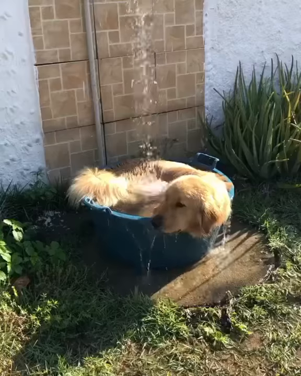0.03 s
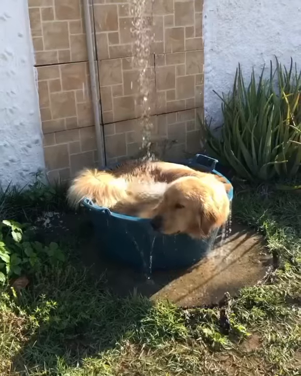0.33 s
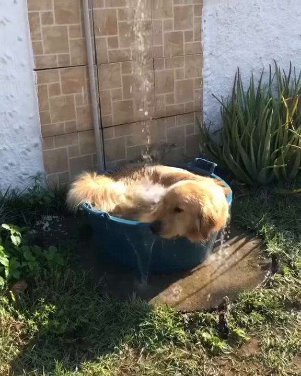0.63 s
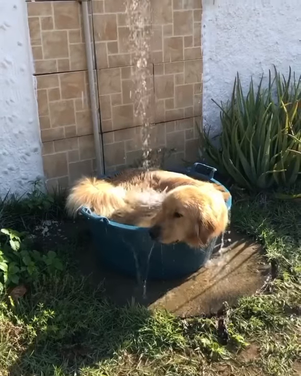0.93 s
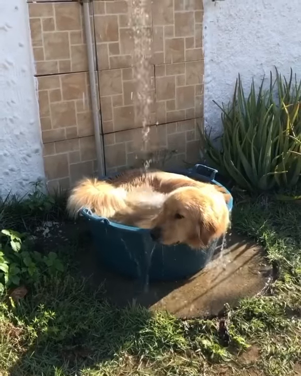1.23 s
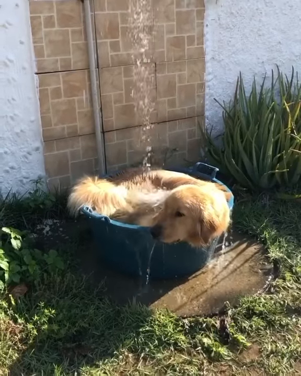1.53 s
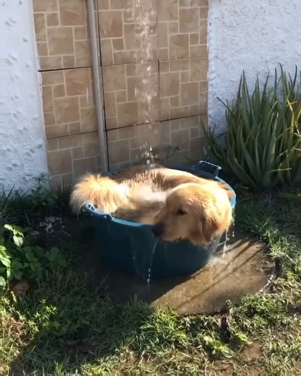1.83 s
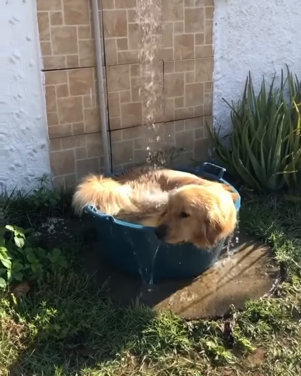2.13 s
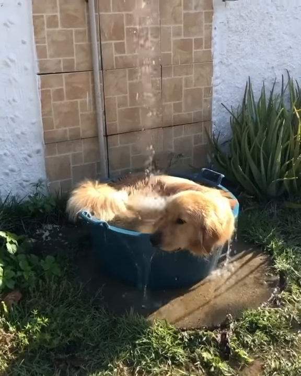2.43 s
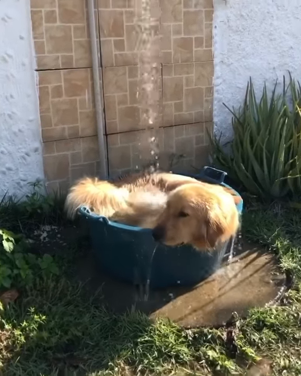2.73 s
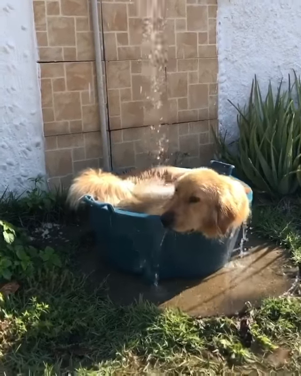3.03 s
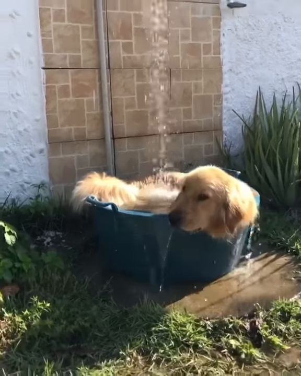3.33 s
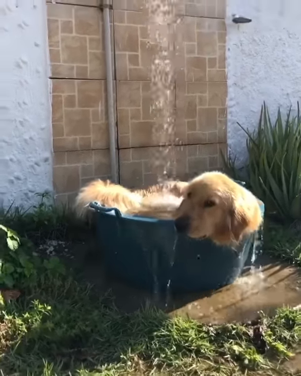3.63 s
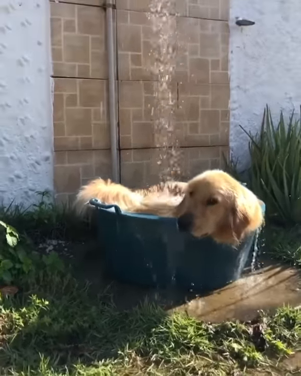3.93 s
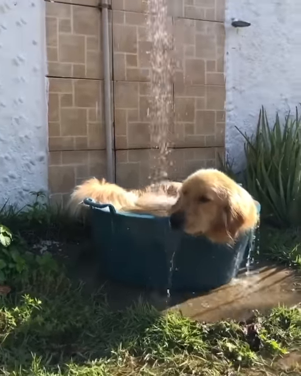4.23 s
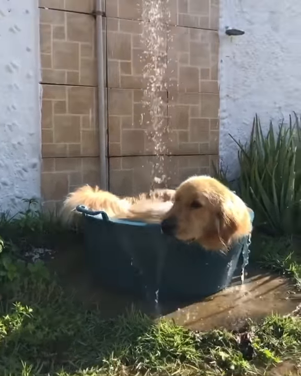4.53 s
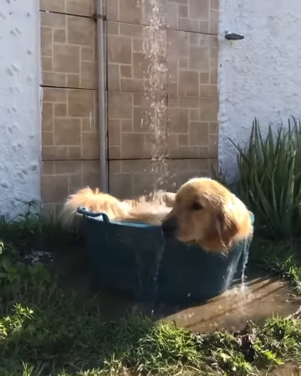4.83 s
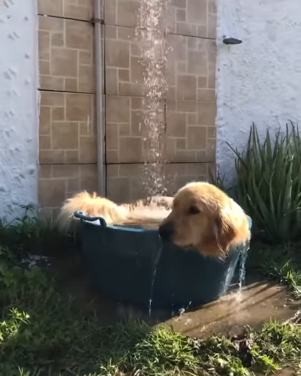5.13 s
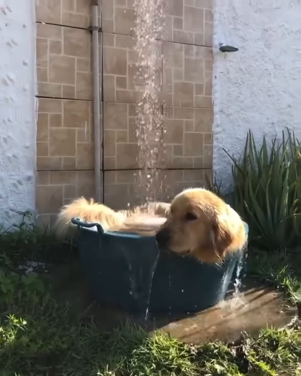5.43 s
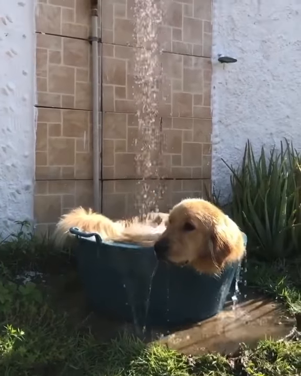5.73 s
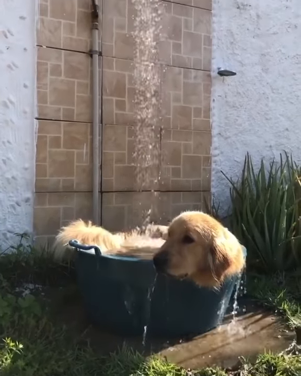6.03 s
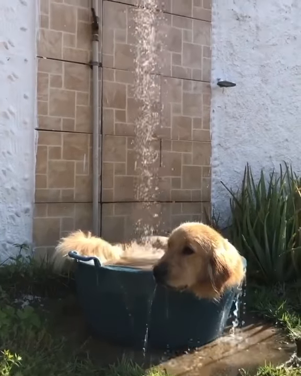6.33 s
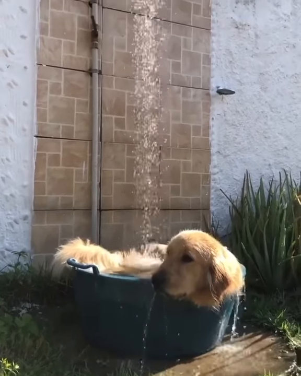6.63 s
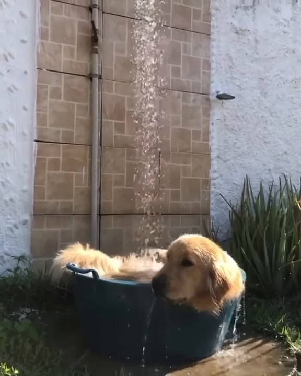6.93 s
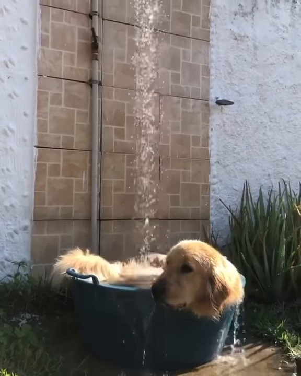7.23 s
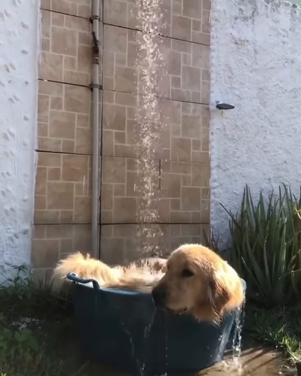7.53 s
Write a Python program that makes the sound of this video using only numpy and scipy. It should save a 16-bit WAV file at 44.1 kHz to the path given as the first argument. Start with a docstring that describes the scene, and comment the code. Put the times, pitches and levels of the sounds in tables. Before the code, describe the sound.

A broken stream of water splashes steadily into a full plastic tub outdoors, overflow pattering on concrete over a faint hum and distant traffic.

```python
"""Close, steady splashing: a broken stream falls from high up into a full plastic tub in a yard.
A dog lies in the tub, and the stream drifts between its back and open water. Each lump of water
slaps, traps air and throws spray; the overflow patters on wet concrete. The wall close behind
colours the splashing at the one microphone, and a motor hum and distant traffic lie underneath."""
import sys
import numpy as np
from scipy import signal
from scipy.fft import rfft, irfft
from scipy.io import wavfile
from scipy.ndimage import uniform_filter1d, map_coordinates

SR = 44100
rng = np.random.default_rng(int(sys.argv[2]) if len(sys.argv) > 2 else 0)


def digitize_waveform(pressure):
    """Quantize a signal to 16-bit integers and store it at the path in sys.argv[1].

    Rows of a 2-D input are taken as channels; values are limited to [-1, 1].
    """
    field = np.atleast_2d(pressure).T
    bounded = np.clip(field, -1, 1)
    quanta = np.round(bounded * 32767).astype(np.int16)
    wavfile.write(sys.argv[1], SR, quanta)


N = 338688
TOP_HZ = 14150  # upper edge of the band


def amp(db):
    """Decibels to gain."""
    return 10 ** (np.asarray(db) / 20)


def unit(x):
    """x at rms 1."""
    return x / np.sqrt(np.mean(x ** 2) + 1e-20)


def noise():
    """White noise as long as the scene."""
    return rng.standard_normal(N)


def along(points, hz):
    """(Hz, value) points interpolated at hz on a log axis."""
    f, v = np.transpose(points)
    return np.interp(np.log(hz + 1), np.log(f + 1), v)


def curves(rows):
    """One value per sample for each column after the time."""
    times, *columns = np.transpose(rows)
    return [np.interp(np.arange(N) / SR, times, column) for column in columns]


def wobble(rate):
    """A smooth random curve, rate knots a second."""
    return map_coordinates(rng.standard_normal(int(N * rate / SR) + 4), [np.arange(N) * rate / SR])


def coloured(x, spectrum, size=8192):
    """x through a causal filter with the given spectrum, at rms 1."""
    cepstrum = irfft(np.log(amp(along(spectrum, np.fft.rfftfreq(size, 1 / SR)))))
    cepstrum[1:size // 2] *= 2  # fold to minimum phase
    cepstrum[size // 2 + 1:] = 0
    impulse = irfft(np.exp(rfft(cepstrum)))
    return unit(signal.fftconvolve(x, impulse)[:N])


def steady(x):
    """x with its slow level evened out."""
    power = uniform_filter1d(uniform_filter1d(x ** 2, SR // 6), SR // 6)
    return x / np.sqrt(np.abs(power) + 1e-12)


def pings(start, gain, hz, cycles, samples, rise=0):
    """Damped sines of peak about gain that swell in a cycle or two, fade over cycles, glide by rise."""
    turns = np.minimum(hz, TOP_HZ)[:, None] * np.arange(samples) / SR
    age = turns / np.reshape(cycles, (-1, 1))
    shape = (1 - np.exp(-turns ** 2 / 2)) * np.exp(-age)
    glide = 1 + rise * np.minimum(age, 2) / 2
    wave = shape / shape.max(axis=1, keepdims=True) * np.sin(2 * np.pi * turns * glide)
    at = (np.abs(start) * SR).astype(int)[:, None] + np.arange(samples)
    return np.bincount(at.ravel(), (gain[:, None] * wave).ravel(), N)[:N]


def bursts(start, gain, life_s, swell_s):
    """The envelope of blows that each build up over swell_s and die away over life_s."""
    power = np.bincount((np.abs(start) * SR).astype(int), gain ** 2, N)[:N]
    keep = np.exp(-1 / (swell_s * SR))
    power = signal.lfilter([1 - keep], [1, -keep], power)
    return np.sqrt(signal.lfilter([1], [1, -np.exp(-2 / (life_s * SR))], power))


def scatter(spread_db, count):
    """Random times with sizes that are mostly small, now and then large."""
    when, chance = rng.random((count, 2)).T
    return when * N / SR, amp(-spread_db * np.log(.035 + .965 * chance))


def pitches(centre_hz, spread, count):
    """Pitches scattered around a centre, with spread on a natural-log scale."""
    return centre_hz * np.exp(spread * np.clip(rng.standard_normal(count), -2, 2))


# The stream at the tub, drifting between open water and the dog's back.
# Each row: time in seconds, then relative levels of plunge, spray and gurgle in dB.
STREAM_LEVELS = [(0, -46, -40.5, -51.5), (1.2, -44.5, -39, -50.5), (2.4, -42.5, -37.5, -49.5),
                 (3.48, -43.5, -37.5, -50), (3.68, -42.5, -38.5, -56), (3.87, -42, -39, -51.5),
                 (4.1, -42.5, -38.5, -55.5), (5.2, -42.5, -38, -53), (6.3, -46, -36.5, -57),
                 (6.7, -47, -37.5, -55.5), (7.68, -44, -37, -52)]
# The colours of those three, heard close up. Each row: frequency in Hz, relative level in dB.
PLUNGE_SPECTRUM = [(30, -45), (150, -15), (330, -9), (600, -17), (950, -13.5), (1200, -3), (1650, -3),
                   (2200, -9), (3200, -3.5), (7000, -50.5)]
SPRAY_SPECTRUM = [(300, -31), (1000, 0), (2000, -0.5), (2900, 1.5), (4600, 1), (6500, 1), (9000, -1),
                  (14000, -4)]
GURGLE_SPECTRUM = [(30, -53), (120, -25), (250, -6.5), (450, -9), (600, 2), (780, 4.5), (900, -0.5),
                   (1100, -34), (2000, -37)]


def stream(lumps=1000):
    """Lumps of water hit the surface: each opens a ringing cavity and throws a cloud of droplets."""
    plunge_db, spray_db, gurgle_db = curves(STREAM_LEVELS)
    start, size = scatter(spread_db=0.84, count=lumps)
    varied = lambda: size * amp(5.2 * rng.random(lumps))  # no two lumps split their energy alike
    cavities = pings(start, varied(), pitches(1414, 0.26, lumps), cycles=1.14, samples=500, rise=0.044)
    churn = bursts(start, varied(), life_s=0.006, swell_s=0.0014) * noise()
    plunge = coloured(amp(-10.5) * unit(cavities) + unit(churn) + amp(-7.5) * noise(), PLUNGE_SPECTRUM)
    # air dragged deeper rings lower, over a steady wash
    pockets = pings(start, varied(), pitches(606, 0.41, lumps), cycles=0.81, samples=900, rise=0.075)
    gurgle = coloured(amp(-11.5) * unit(pockets) + noise(), GURGLE_SPECTRUM)
    # droplets land loudest just after each lump; the same cloud hisses as a mist
    landing, weight = scatter(spread_db=3.5, count=13000)
    cloud = bursts(start, varied(), life_s=0.019, swell_s=0.0011)
    droplet_hz = rng.uniform(1200, TOP_HZ, len(landing))
    droplet_gain = weight * cloud[(landing * SR).astype(int)] * droplet_hz
    droplets = pings(landing, droplet_gain, droplet_hz, cycles=0.81, samples=90)
    mist = unit(cloud * noise())
    spray = coloured(unit(droplets) + amp(-2.5) * mist + amp(0.5) * noise(), SPRAY_SPECTRUM)
    body = amp(gurgle_db - 6.5) * steady(gurgle) + amp(plunge_db - 7.0) * steady(plunge)
    return body, amp(spray_db - 4.5) * steady(spray)


# The colour of a wet slap at the tub. Each row: frequency in Hz, relative level in dB.
SPLAT_SPECTRUM = [(300, -21), (700, -5), (1100, -3.5), (1700, 6), (2200, 1), (3300, 0), (5000, 4),
                  (7500, -7.5), (14000, -4)]


def splats():
    """Middling drops break away from the stream and land one by one, each with a short wet tick."""
    spray_db = curves(STREAM_LEVELS)[1]
    start, size = scatter(spread_db=2.5, count=480)
    ticks = bursts(start, size, life_s=0.0028, swell_s=0.00035) * noise()
    return amp(spray_db - 10.5) * coloured(ticks, SPLAT_SPECTRUM)


def overflow(drops=1100, bubbles=1000):
    """Water off the rim patters on the concrete, and tiny bubbles fizz in the puddle."""
    spray_db = curves(STREAM_LEVELS)[1]
    start, size = scatter(spread_db=5.0, count=drops)
    patter = pings(start, size, pitches(5160, 0.36, drops), cycles=1.34, samples=220)
    start, size = scatter(spread_db=1.0, count=bubbles)
    fizz = pings(start, size, pitches(7400, 0.36, bubbles), cycles=42.7, samples=1200, rise=0.0363)
    return amp(spray_db - 13.0) * unit(patter) + amp(spray_db - 13.5) * unit(fizz)


# The path off the wall to the microphone, under a metre longer than the direct one.
# Each row: time in seconds, delay in milliseconds.
WALL_DELAY = [(0, 2.34), (2.3, 2.46), (4, 2.556), (7.68, 2.62)]


def wall(x, share, dull_hz):
    """The wall behind the tub returns a duller copy just after the direct sound."""
    late = np.arange(N) - curves(WALL_DELAY)[0] * SR / 1000
    dull = signal.sosfiltfilt(signal.butter(1, dull_hz, fs=SR, output="sos"), x)
    return x + share * map_coordinates(dull, [late], order=1)


# The yard around the microphone. Each row: frequency in Hz, seconds to die away by 60 dB.
YARD_DECAY = [(200, 0.17), (2000, 0.045), (12000, 0.12)]


def yard(x, slices=60):
    """A short diffuse tail from walls and ground, redrawn several times a second so no pitch rings."""
    hz, t, spectra = signal.stft(rng.standard_normal((slices, SR // 6)), SR, nperseg=256)
    decay = amp(-60 * t / along(YARD_DECAY, hz)[:, None])
    tails = signal.istft(spectra * decay, SR, nperseg=256)[1]
    out = np.zeros(N + SR)
    for part, tail in zip(np.array_split(np.arange(N), slices), tails):
        answer = signal.fftconvolve(x[part], tail / np.linalg.norm(tail))
        out[part[0]:][:len(answer)] += answer
    return out[:N]


# Traffic far beyond the yard, drawing nearer. Each row: time in seconds, level in dB.
RUMBLE_LEVEL = [(0, -58.5), (1.8, -57), (2.3, -56.5), (3.5, -56), (5.0, -54), (5.8, -53.5), (7.68, -55)]
# Its colour at this distance. Each row: frequency in Hz, relative level in dB.
RUMBLE_SPECTRUM = [(20, -48), (45, -11), (65, 0), (100, -1.5), (160, -5), (250, -8), (500, -17.5),
                   (2000, -67)]
# Its loose swells. Each row: loudest moment and half length in seconds, centre in Hz, level in dB.
RUMBLE_SWELLS = [(3.4, .17, 109, -57), (3.4, 0.23, 184, -61), (4.22, .06, 172, -59), (4.8, 0.23, 149, -63),
                 (5.8, .15, 100, -60), (6.42, 0.093, 111.5, -51), (7.4, .2, 118, -60.5)]
# One far engine pulling.
# Each row: loudest moment in seconds, firing rate in Hz, its rise in Hz per second, level in dB.
ENGINE_PULLS = [(3.0, 72.5, 3, -60), (5.15, 75.2, 5, -58), (7.33, 82.6, 32, -51)]


def traffic(skirt_db=-47, pull_half_s=0.25):
    """A low rumble with loose swells, and one far engine that grows and speeds up each time it pulls."""
    t = np.arange(N) / SR
    swell = lambda peak_s, half_s: np.exp(-((t - peak_s) / half_s) ** 2 / 2)
    out = amp(curves(RUMBLE_LEVEL)[0]) * coloured(noise(), RUMBLE_SPECTRUM)
    for peak_s, half_s, hz, db in RUMBLE_SWELLS:
        band = coloured(noise(), [(hz / 2, skirt_db), (hz, 0), (hz * 2, skirt_db), (hz * 10, -100)])
        out += amp(db) * swell(peak_s, half_s) * band
    for peak_s, hz, rise, db in ENGINE_PULLS:
        firing_hz = (hz + rise * (t - peak_s)) * (1 + 0.013 * wobble(8.8))
        engine = np.sin(2 * np.pi * np.cumsum(firing_hz) / SR)
        out += amp(db + 1.6 * wobble(12.0)) * swell(peak_s, pull_half_s) * engine
    return out


# Mains hum, swelling and sinking faintly behind the water. Each row: time in seconds, level in dB.
MAINS_LEVEL = [(0, -75), (2.4, -65), (3.2, -62), (3.6, -58.5), (4.8, -58), (6.2, -62), (6.42, -63),
               (6.65, -59), (7.68, -61)]


def hum(mains_hz=119.7, motor_hz=58.8, motor_db=-51.5, on_s=3.79, off_s=5.33, fade_s=0.17):
    """A wavering mains hum, and the deep tone of a motor that fades in, holds and fades out."""
    t = np.arange(N) / SR
    mains_db = curves(MAINS_LEVEL)[0] + 1.6 * wobble(7)
    mains = amp(mains_db) * np.sin(2 * np.pi * mains_hz * t + 0.44 * wobble(9))
    running = np.clip(np.minimum(t - on_s, off_s - t) / fade_s + .5, 0, 1)
    return mains + amp(motor_db) * running * np.sin(2 * np.pi * motor_hz * t)


# Sheets of droplets flung from the tub, landing together nearby.
# Each row: start and length in seconds, rms level in dB, centre pitch in Hz.
FLUNG_SHEETS = [(0.176, 0.013, -43, 3450), (0.22, .007, -45, 3300), (0.374, 0.035, -43.5, 3730),
                (0.887, .014, -41.5, 3200), (1.281, 0.016, -42, 3820), (1.466, 0.0037, -37, 2900),
                (1.91, 0.033, -50, 6500), (2.218, 0.03, -41.5, 8200), (2.256, 0.015, -42, 6000),
                (2.393, 0.017, -40, 4500), (2.712, 0.034, -41, 6240), (3.851, 0.012, -39, 4900),
                (3.877, 0.023, -40, 5000), (4.023, 0.01, -38.5, 6800), (4.179, 0.016, -43, 3500),
                (4.269, 0.0064, -41, 5300), (4.31, 0.011, -39, 7500), (4.527, 0.025, -40.5, 8100),
                (4.736, 0.0076, -43, 3700), (4.747, 0.019, -40, 6000), (4.919, 0.027, -42.5, 5600),
                (5.339, .018, -46, 6160), (5.623, 0.011, -43, 4530), (5.765, .012, -36.5, 8550),
                (6.135, 0.0057, -38, 2800), (6.291, 0.0047, -38, 2800), (6.575, 0.01, -37, 8500),
                (6.756, 0.011, -39.5, 5900), (6.835, 0.017, -39, 8600), (6.921, 0.011, -39, 9000),
                (7.082, .009, -47, 9300), (7.244, 0.0087, -42, 7500), (7.337, 0.022, -40, 6560),
                (7.414, 0.012, -45, 2180), (7.598, 0.0097, -39, 4320)]


def spatters(droplets=40, size_range_db=1):
    """A sheet of flung water breaks up and lands as a brief rattle of tiny ticks."""
    out = np.zeros(N)
    for start, length, db, hz in FLUNG_SHEETS:
        when, size = rng.random((2, droplets))
        gain = amp(size_range_db * size)
        ticks = pings(start + length * when, gain, pitches(hz, 0.31, droplets), cycles=0.72, samples=200)
        out += amp(db) * ticks * np.sqrt(length * SR / np.sum(ticks ** 2))
    return out


# The biggest drops, sharp and close at the microphone.
# Each row: start in seconds, peak level in dB, pitch in Hz, ring in cycles.
BIG_DROPS = [(0.217, -25.5, 3420, 1), (0.2602, -29, 4800, 1), (0.304, -26, 4770, 0.9),
             (0.4614, -24, 3160, .85), (0.652, -28, 4630, 1.3), (0.92, -29, 4240, 1.2),
             (1.12, -30, 4110, .9), (1.4612, -20, 5300, .8), (1.912, -22, 7000, 1),
             (2.1304, -21.5, 3500, 1), (2.5208, -27, 3500, 1), (2.713, -24, 4690, 1),
             (2.7295, -27, 4770, 1), (2.8899, -29, 4900, 4.7), (2.951, -25, 3800, 0.92),
             (3.002, -26.5, 3500, 2.4), (3.021, -22.5, 4150, 4), (3.151, -26, 6400, 2.5),
             (3.347, -27.5, 3620, 2), (3.4261, -20, 4360, .7), (3.474, -18, 8240, 1.5),
             (3.4912, -28, 4140, 3), (3.5045, -18, 4800, 0.77), (4.03, -24, 5900, 1.2),
             (4.1548, -21.5, 10500, .8), (4.265, -22, 7500, 0.62), (4.311, -19.5, 6650, 1.2),
             (4.316, -24, 7000, 1.2), (4.342, -28, 3230, 1), (4.7343, -26, 3260, 1.2),
             (4.8513, -29, 3010, 0.63), (4.9095, -28, 4300, 1.5), (5.0175, -26, 7100, 1.6),
             (5.0785, -27, 4870, 1), (5.207, -23, 5300, 0.53), (5.2638, -33, 4010, 1),
             (5.3575, -27, 5450, 1), (5.3997, -29, 4400, 3), (5.5095, -24, 8040, 1),
             (5.5918, -23.5, 5580, 1.5), (5.769, -24, 5800, 1), (5.8297, -28, 7500, 1),
             (5.8483, -23, 5000, 1), (5.9105, -23, 6100, 2), (5.923, -28, 4320, 1.2),
             (5.9948, -28, 3200, 1.2), (6.0238, -25, 4860, 1.5), (6.0497, -27.5, 2930, 1.5),
             (6.096, -12, 4230, 1.1), (6.2092, -21, 3400, 0.64), (6.2205, -25, 6000, 1),
             (6.2438, -27, 4010, 1.5), (6.256, -26, 4610, 1.2), (6.4883, -25, 2900, 3.1),
             (6.573, -23, 6730, 1.1), (6.582, -21, 6200, 0.68), (6.6802, -27, 3440, 0.81),
             (6.8379, -18, 6750, 2), (6.8817, -23, 8500, 1), (6.9265, -19, 10100, 1),
             (7.0255, -26, 5690, 2.2), (7.0506, -23, 4800, 1.4), (7.0863, -21, 9800, 1.2),
             (7.088, -18, 9300, 1.2), (7.1735, -26, 4200, 0.9), (7.2409, -22.5, 3700, 0.51),
             (7.3315, -20, 6100, 0.79), (7.3605, -27, 4810, 1.2), (7.4211, -23, 5520, 3),
             (7.466, -22, 8040, 1.5), (7.5662, -19.5, 6700, 1.5)]


def smacks(trailing_drops=3, snap_lag_s=0.001, wake_s=0.0064):
    """A big drop gives a snap of a few cycles and a short spit of spray; smaller drops land in its wake."""
    start, db, hz, ring = np.transpose(BIG_DROPS)
    snap = pings(start + snap_lag_s, amp(db), hz, ring, samples=400)
    spit = bursts(start, amp(db), life_s=0.0036, swell_s=0.0011) * coloured(noise(), SPRAY_SPECTRUM)
    wake = np.zeros(N)
    for _ in range(trailing_drops):
        landing = start + snap_lag_s + wake_s * rng.random(len(start))
        wake += pings(landing, amp(db), pitches(hz, 0.29, len(start)), cycles=0.68, samples=300)
    return snap + amp(-23) * spit + amp(-15.5) * wake


# The heaviest lumps plunging into the tub.
# Each row: start in seconds, relative level in dB, cavity pitch in Hz, ring in cycles.
HEAVY_LUMPS = [(0.22, -45, 460, 1.7), (0.238, -39, 780, 2.3), (0.336, -34, 1650, 1.3),
               (0.338, -39, 620, .8), (0.413, -33.5, 1300, 1.8), (0.68, -37, 1430, 1.6),
               (0.795, -33, 680, 0.9), (0.828, -27.5, 1390, 1.5), (0.883, -37, 780, 2),
               (0.897, -33, 1500, 1.4), (0.939, -36, 1320, 3), (0.982, -40, 780, 2.2),
               (1.045, -31.5, 1400, 1.7), (1.122, -38, 770, 3.6), (1.124, -44, 400, .8),
               (1.186, -31, 1700, 0.84), (1.189, -41, 500, .9), (1.295, -37, 810, 1.9),
               (1.464, -34, 1990, 1.6), (1.682, -38, 730, 1.2), (1.718, -30, 1430, 1.6),
               (1.73, -30, 1650, 1.5), (1.81, -42, 766, 3.4), (1.833, -39, 760, 2), (1.838, -36, 1250, 2),
               (1.91, -30, 1820, 1.5), (1.855, -35, 807, 3.5), (1.93, -37, 820, 0.79),
               (1.954, -39, 800, 1.5), (2.037, -33.5, 696, 4.4), (2.046, -31, 1320, 1.5),
               (2.258, -24, 1590, 1.3), (2.352, -31, 1390, 1.4), (2.404, -34, 840, 1.7),
               (2.423, -31.5, 1230, 2), (2.551, -44, 780, 2), (2.602, -32.5, 1300, 2),
               (2.636, -32, 1660, 1.6), (2.725, -32, 1290, 1.9), (2.821, -31, 1100, 1.1),
               (3.05, -35, 360, 0.5), (3.21, -30, 2220, 2.5), (3.224, -30, 1590, 1.8),
               (3.225, -34, 800, 1.7), (3.285, -33, 1370, 1.4), (3.344, -30, 1510, 1.2),
               (3.452, -27.5, 1650, 2.5), (3.535, -43, 337, 1.1), (3.562, -35.5, 770, 1.6),
               (3.834, -28.5, 1580, 3.2), (3.848, -35.5, 810, 1.6), (3.98, -31, 1450, 1.9),
               (4.052, -29, 1490, 1.4), (4.14, -29.5, 1590, 2), (4.573, -41, 705, 2), (4.623, -39, 800, 2),
               (4.693, -33, 1610, 1.5), (4.705, -25, 1730, 1.8), (4.758, -31, 1540, 1.4),
               (4.783, -40, 725, 2.2), (4.799, -29.5, 1570, 2), (4.85, -24, 1680, 1.3),
               (4.929, -41, 430, .8), (5.014, -31.5, 1670, 1.5), (5.077, -38, 800, 1.1),
               (5.078, -44, 350, 1), (5.223, -36, 975, 2), (5.246, -29.5, 1130, 2.3),
               (5.318, -36, 1720, 1.4), (5.341, -28, 1450, 1.8), (5.358, -43, 303, 2.1),
               (5.786, -31.5, 1160, 2.5), (5.826, -39.5, 704, 2.2), (5.899, -30, 1590, 1.2),
               (5.9, -38, 880, 1.7), (5.959, -33, 1550, 1.4), (5.989, -36, 756, 1.3),
               (6.175, -40, 820, 1.1), (6.189, -35, 1780, 2), (6.216, -31, 1460, 2.8),
               (6.234, -34, 1460, 1.5), (6.236, -38.5, 710, 2), (6.311, -32, 1300, 1.6),
               (6.69, -29, 1330, 1.8), (6.716, -28, 1200, 1.8), (6.765, -40, 790, 1.3),
               (6.826, -33.5, 1570, 1.5), (6.862, -34, 1330, 1.6), (6.946, -36, 1350, 1.1),
               (7.068, -27.5, 1530, 1.4), (7.092, -31.5, 1520, 1.3), (7.123, -31, 1380, 4.3),
               (7.151, -30, 1590, 1.5), (7.169, -32, 1630, 1.5), (7.213, -33, 1620, 1),
               (7.241, -29, 1620, 2), (7.269, -32.5, 1530, 1.3), (7.327, -29.5, 1640, 2),
               (7.356, -37, 735, 1.7), (7.394, -29, 1550, 1.8), (7.413, -25, 1650, 1.5),
               (7.539, -39, 830, 1.6), (7.602, -41, 754, 2)]


def plops(pocket_count=3, cavity_lag_s=0.00161, shedding_s=0.00492):
    """A heavy lump slaps the surface and opens a brief cavity, which sheds air pockets and splashes."""
    start, db, hz, ring = np.transpose(HEAVY_LUMPS)
    gain = amp(db)
    slap = bursts(start, gain, life_s=0.004, swell_s=0.0003) * coloured(noise(), SPLAT_SPECTRUM)
    cavity = pings(start + cavity_lag_s, gain, hz, ring, samples=2600, rise=0.0077)
    pockets = np.zeros(N)
    for _ in range(pocket_count):
        shed = start + shedding_s * rng.random(len(start))
        pockets += pings(shed, gain, pitches(hz, 0.25, len(start)), cycles=0.84, samples=900, rise=0.06)
    splash = bursts(start, gain, life_s=0.005, swell_s=0.00079) * coloured(noise(), PLUNGE_SPECTRUM)
    return amp(-17) * slap + amp(-3.5) * cavity + amp(-16.5) * pockets + amp(-12.5) * splash


def scene():
    """From beside the tub: splashing in front of the wall, over the hum and the far traffic."""
    body, spray = stream()
    water = wall(body + plops(), share=0.34, dull_hz=2860)
    water += wall(spray + splats(), share=0.22, dull_hz=2880)
    water += overflow() + smacks() + spatters()
    return (water + amp(-7.0) * yard(water) + hum() + traffic())[None]


def record(dry):
    """A brief silence, then the splashing, with nothing above the band limit."""
    silence_s = 0.035
    live = dry * (np.arange(N) >= silence_s * SR)
    lowpass = signal.firwin(401, TOP_HZ, fs=SR, window="blackman")
    return signal.fftconvolve(live, lowpass[None], "same", axes=1)


dry = scene()
out = record(dry)
digitize_waveform(out)
```